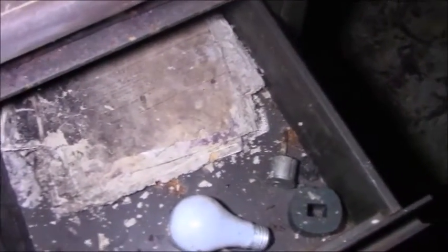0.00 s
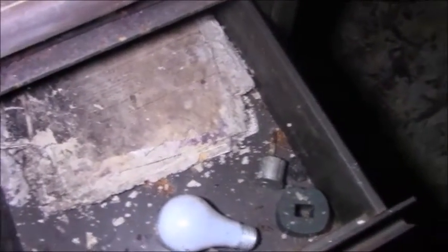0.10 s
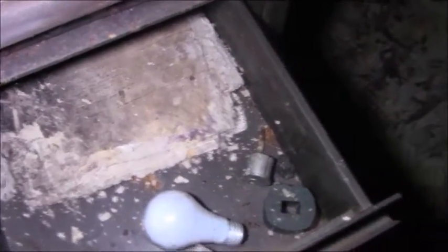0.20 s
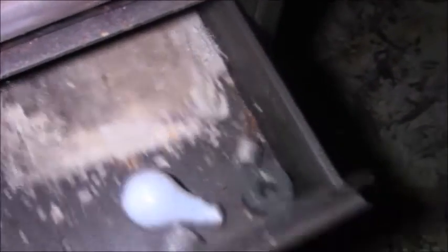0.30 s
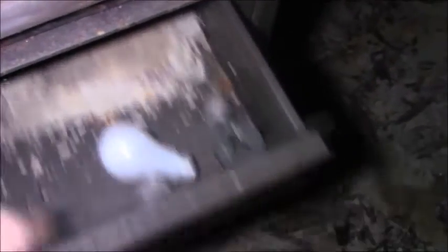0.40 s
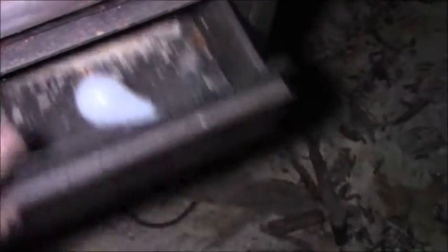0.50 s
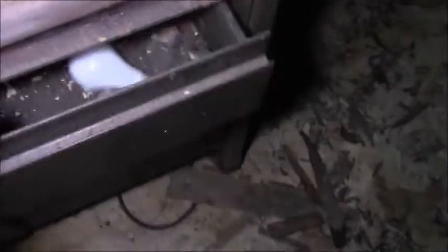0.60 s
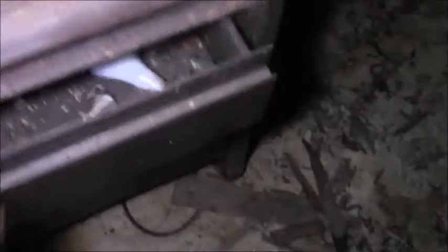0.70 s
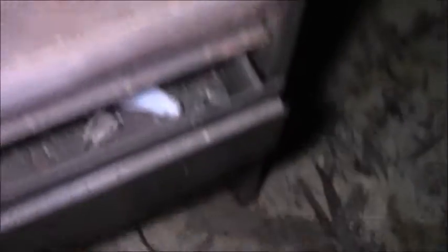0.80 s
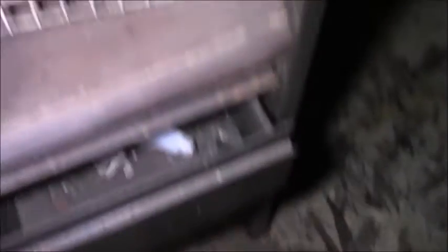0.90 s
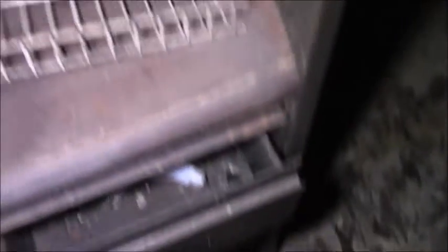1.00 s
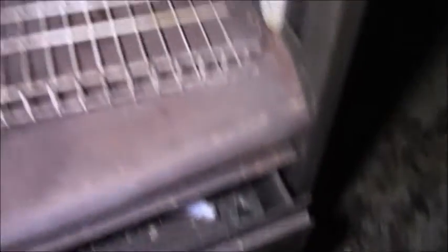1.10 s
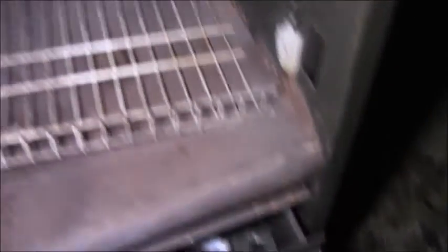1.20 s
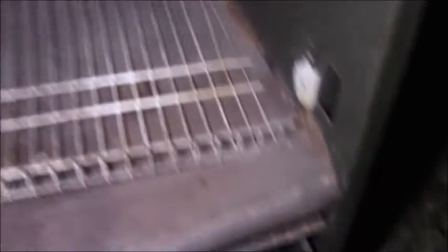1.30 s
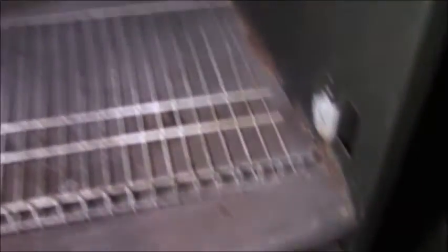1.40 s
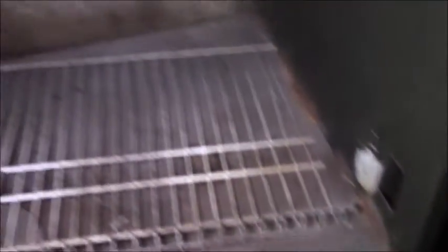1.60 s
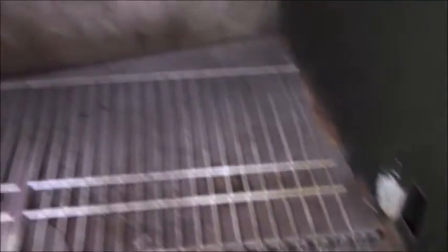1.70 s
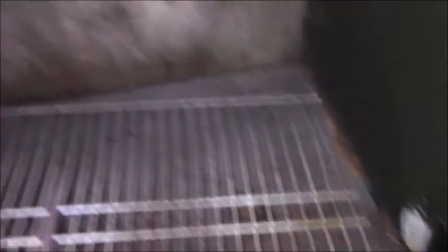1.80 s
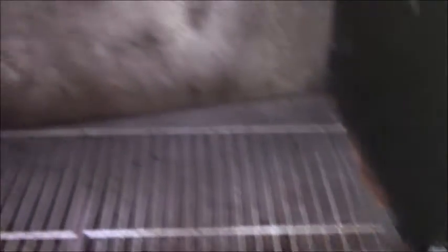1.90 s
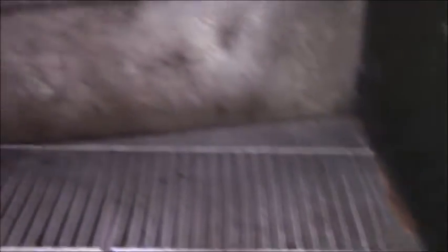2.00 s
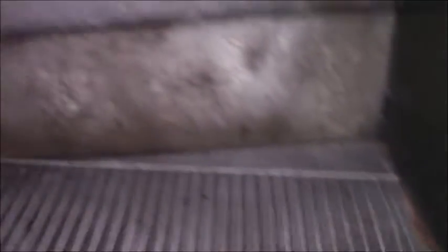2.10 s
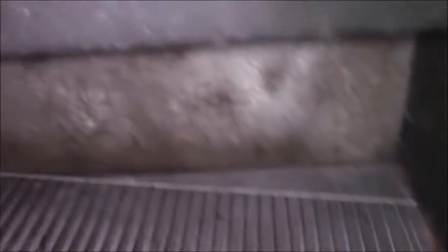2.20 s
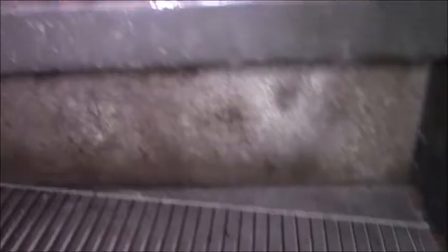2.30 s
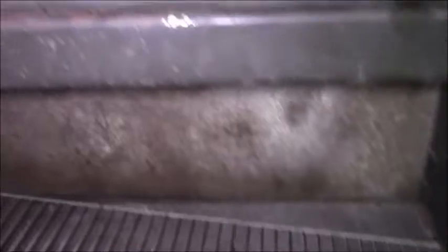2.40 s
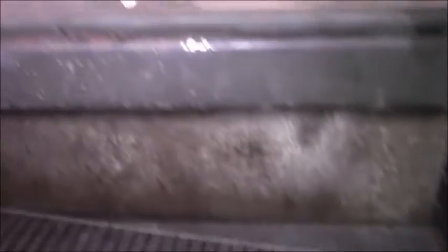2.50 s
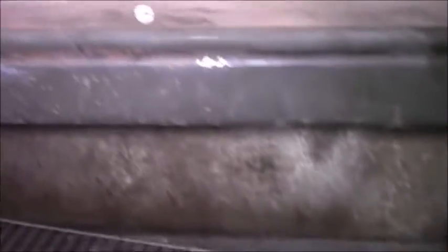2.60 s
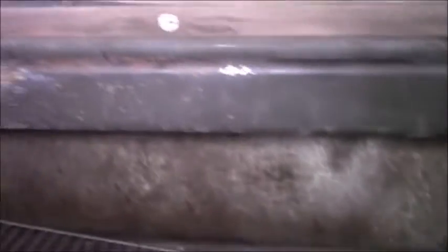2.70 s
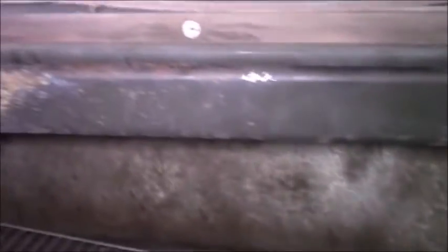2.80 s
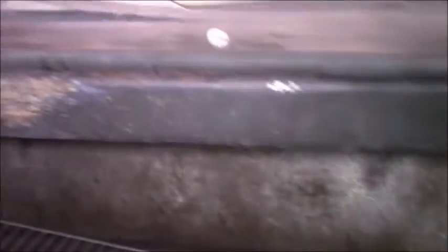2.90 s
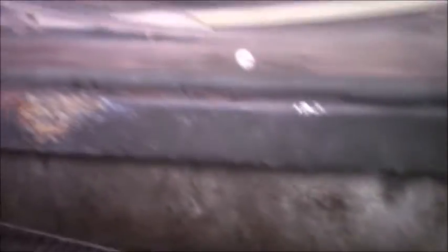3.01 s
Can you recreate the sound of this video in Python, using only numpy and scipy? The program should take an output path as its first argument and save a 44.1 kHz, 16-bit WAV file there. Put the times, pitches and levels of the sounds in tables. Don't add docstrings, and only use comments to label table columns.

```python
import sys
import numpy as np
from scipy import signal
from scipy.fft import rfft, irfft
from scipy.io import wavfile

SR = 44100
rng = np.random.default_rng(int(sys.argv[2]) if len(sys.argv) > 2 else 0)


def gain_from_db(level_db):
    decades = np.asarray(level_db, float) / 20
    return 10 ** decades


def output_pcm(signal):
    pcm = np.clip(np.atleast_2d(signal).T, -1, 1) * 32767
    wavfile.write(sys.argv[1], SR, np.round(pcm).astype(np.int16))


N = 134505


def rms_one(x):
    return x / np.sqrt(np.mean(x ** 2) + 1e-20)


def at_hz(points, hz):
    table_hz, values = np.transpose(points)
    return np.interp(np.log(hz), np.log(table_hz), values)


def through(x, response):
    return signal.fftconvolve(x, response)[:N]


def modes(table, size=SR):
    t = np.arange(size) / SR
    return sum(gain_from_db(db - 60 * t / t60) * np.sin(2 * np.pi * hz * t) for hz, db, t60 in table)


def wobble(per_s):
    return np.interp(np.arange(N) * per_s / SR, np.arange(999), rng.standard_normal(999))


def linger(power, t60):
    keep = gain_from_db(-120 / (t60 * SR))
    return signal.lfilter([1 - keep], [1, -keep], power + 1e-18)


# (frequency [Hz], level [dB])
AIR = [(24, -36.5), (40, -22.5), (107, -9.5), (824, -10), (1030, -12), (7730, -25.5), (14300, -42)]


def room_air():
    hz = np.fft.rfftfreq(N, 1 / SR) + 1
    air = irfft(rfft(rng.standard_normal((2, N))) * gain_from_db(at_hz(AIR, hz)), N)
    mid_side_db = np.array([[-57.5], [-70.5]])
    return air / np.std(air[0]) * gain_from_db(mid_side_db)


# (frequency [Hz], level [dB])
WHINE = [(7504, -76), (15003, -76)]


def whine():
    t = np.arange(N) / SR
    return sum(gain_from_db(db + 2) * np.sin(2 * np.pi * hz * t) for hz, db in WHINE)


def squeak():
    t = np.arange(N) / SR
    middle_s, length_s, hz = 1.875, 0.017, 4250
    return gain_from_db(-62) * np.exp(-((t - middle_s) / length_s) ** 2) * np.sin(2 * np.pi * hz * t)


# (time [s],
# level [dB], pitch [Hz])
FLAKES = [(0.846, -29, 7800), (.879, -46, 12000), (.9945, -27, 7400), (1.025, -43, 9100),
          (1.045, -50, 10000), (1.088, -46, 11000), (1.1275, -53, 9000), (1.1555, -26, 7000),
          (1.212, -48, 8000), (1.388, -46, 8000), (1.41, -48, 9000), (2.866, -46, 10000),
          (2.782, -42, 11000), (2.838, -38, 6500)]
# (time [s], level [dB], pitch [Hz],
# fade [cycles])
POPS = [(0.03, -27, 485, 26), (0.2123, -18.5, 323, 19), (0.2133, -18, 515, 15), (.284, -17.5, 780, 33),
        (.405, -21, 980, 16), (.46, -18.5, 1320, 33), (.54, -13.5, 300, 11), (.636, -16.5, 211, 12),
        (1.154, -29.5, 1720, 78), (1.2801, -25, 990, 25), (2.1004, -37.5, 1500, 8), (2.0718, -44, 1010, 6),
        (2.147, -24, 1370, 25), (2.164, -14, 308, 18), (2.193, -16.5, 297, 15), (2.408, -18, 436, 19),
        (2.69, -9.5, 1000, 28), (2.689, -16.5, 2330, 16), (2.688, -8, 4200, 14)]


def pops_and_flakes():
    out = np.zeros(N + SR)
    flake_cycles = 16
    for s, db, hz, cycles in [*POPS, *[(*flake, flake_cycles) for flake in FLAKES]]:
        start = int(s * SR)
        out[start:start + SR // 4] += modes([(hz, db, cycles / hz)], size=SR // 4)
    return out[:N]


# (time [s], level [dB], contact pitch [Hz])
TICKS = [
    (1.4525, -17, 5600),
    (1.5278, -24.5, 5300),
    (1.5664, -33, 5400),
    (1.588, -47, 6100),
    (1.6438, -31, 1950),
    (1.719, -44, 2600),
    (1.92, -43, 6100),
    (1.937, -54, 7000),
]
# (frequency [Hz], level [dB], t60 [s])
PIECE = [(9200, -22, 0.03), (9320, -24, 0.03), (9588, -40, 0.5), (15010, -26, .06), (7320, -8.5, 0.004),
         (10400, -26.5, .008), (12800, -21.5, 0.0052)]


def metal_piece():
    out = np.zeros(N + SR)
    contact_cycles = 12.3
    for s, db, contact_hz in TICKS:
        dull_db = 14 * (contact_hz < 4000)
        rings = [(hz, ring_db - dull_db, t60) for hz, ring_db, t60 in PIECE]
        tick = modes([(contact_hz, 0, contact_cycles / contact_hz)] + rings, size=SR // 2)
        start = int(s * SR)
        out[start:start + SR // 2] += gain_from_db(db) * tick
    return out[:N]


# (frequency [Hz], level [dB], t60 [s])
GLASS = [(2230, 9, 0.016), (1980, -14, 0.12), (2141, 2.5, 0.17), (2165, 3, 0.17), (5146, -19, 0.22),
         (3058, -38, 0.8), (5160, -21, 0.22), (3187, -13, 0.11), (3505, -13, 0.058), (4300, -23.5, .07),
         (6600, -18, 0.07), (8445, -17, 0.06), (10770, -26.5, 0.05), (1290, 0.5, 0.021)]
# (time [s], level [dB], contact softness corner [Hz])
CLINKS = [
    (.7087, -12.5, 20000),
    (.915, -42.5, 2200),
]


def bulb_clinks():
    out = np.zeros(N + SR)
    for s, db, soft_hz in CLINKS:
        struck = []
        for hz, mode_db, t60 in GLASS:
            softness_db = 20 * np.log10(1 + (hz / soft_hz) ** 4)
            struck.append((hz, mode_db + db - softness_db, t60))
        start = int(s * SR)
        out[start:start + SR] += modes(struck[::2]) - modes(struck[1::2])
    return out[:N]


# (time [s], level [dB])
ROLL = [
    (.7, -21.5),
    (.8, -25.5),
    (0.949, -39.5),
    (1.02, -32.5),
    (1.121, -36.5),
    (1.251, -44),
    (1.35, -33),
    (1.45, -42),
    (1.621, -51),
]


def bulb_roll():
    s, db = np.transpose(ROLL)
    return gain_from_db(np.interp(np.arange(N) / SR, s, db, -150, -150))


def small_things_in_room(small):
    tail = rng.standard_normal((2, SR)) * gain_from_db(-60 * np.arange(SR) / SR / 0.38)
    tail = tail / np.sqrt(np.sum(tail[0] ** 2))
    mid = small + gain_from_db(-16.5) * through(small, tail[0])
    side = 0.058 * small + gain_from_db(-24.5) * through(small, tail[1])
    return np.array([mid, side])


def grains():
    grains_per_s, spread_db, clump_db, clumps_per_s = 6000, 2.5, 2, 40
    size_db = spread_db * np.minimum(rng.exponential(1, N), 4) + clump_db * wobble(clumps_per_s)
    clicks = gain_from_db(size_db) * rng.choice([-1, 1], N)
    return rms_one(clicks * (rng.random(N) < grains_per_s / SR))


def contact(strokes, knocks):
    t, out = np.arange(N) / SR, np.zeros((3, N))
    for stroke in strokes:
        s, force_db, grit_db, boom_db = np.transpose(stroke)
        force = gain_from_db(np.interp(t, s, force_db, -150, -150))
        grit = force * gain_from_db(np.interp(t, s, grit_db))
        boom = force * gain_from_db(np.interp(t, s, boom_db))
        out += [force, grit, boom]
    for s, force_db, length_s, grit_db, boom_db in knocks:
        rise = np.clip((t - s) / (0.29 * length_s), 0, 1)
        fade = np.exp(-np.maximum(t - s, 0) / length_s)
        out += gain_from_db(force_db + np.array([[0], [grit_db], [boom_db]])) * rise * fade
    return out


# (time [s], force [dB], grit re force [dB], boom re force [dB])
PUSH = [
    (.125, -57, 3.5, -6),
    (.19, -31.5, -16.5, -5),
    (.25, -36.5, -13.5, 13),
    (.275, -32, -7, 6),
    (.29, -28.5, -5, -1),
    (.34, -27.5, -8, 9.5),
    (.385, -25, -6.5, 1),
    (.41, -20.5, -13, 3.5),
    (.455, -22, -15.5, -3),
]
PUSH_2 = [
    (.455, -23.5, -7, -0.5),
    (.5, -20, -8, -4),
    (.525, -19, -7.5, -2),
    (.545, -20, -11.5, 3),
    (.6, -23.5, -11, 1),
    (.635, -28.5, -13, 8),
    (.655, -35.5, -22, 19.5),
    (.68, -39, -18.5, 1),
    (0.699, -23.5, -12.5, 0),
]
# (time [s], force [dB], length [s], grit re force [dB], boom re force [dB])
PUSH_KNOCKS = [(0.009, -41, 0.0089, 1.5, -14), (0.027, -23.5, 0.005, 0, -33),
               (0.189, -28, 0.0038, -2, 12.5), (0.205, -34, 0.01, -37, 4), (0.283, -24.5, 0.0075, -23.5, 7),
               (0.458, -22, 0.0072, -2, -35), (0.68, -56, 0.0076, -16, 21), (.709, -7, 0.0023, -11.5, -13),
               (0.839, -31, 0.019, -6.5, -10), (0.982, -33.5, 0.022, -12.5, -1),
               (1.144, -29, 0.03, -10, -12), (1.162, -38, 0.0063, -6, 7), (1.218, -38, 0.019, -17, -1),
               (1.28, -27, 0.012, -13.5, -22), (1.292, -30.5, 0.021, -16.5, 8.5),
               (1.468, -44.5, 0.032, -9, -15), (1.639, -50.5, 0.0098, -0.5, -4),
               (1.692, -56, 0.0087, -13.5, 1.5)]


def push_contact():
    return contact([PUSH, PUSH_2], PUSH_KNOCKS)


# (time [s], force [dB], grit re force [dB], boom re force [dB])
HAND = [
    (1.8, -87, -2, 2.5),
    (1.87, -68, -17, -5),
    (2.0, -62, 13, 9),
    (2.06, -61, -4, 2),
    (2.8, -62.5, 0, -3),
    (2.95, -50, 0.5, 4),
    (3.05, -51, -3, 2),
]
# (time [s], force [dB], grit re force [dB], boom re force [dB])
PULL_1 = [
    (2.2, -51.5, -37, 25),
    (2.25, -42, -4.5, 10),
    (2.3, -32.5, -9, 5.5),
    (2.33, -23, -5, 3),
    (2.365, -19.5, -6, -3),
    (2.41, -18.5, -8.5, -3.5),
    (2.45, -22, -12.5, 1),
    (2.51, -32, -18, 13.5),
    (2.56, -36, -9, 5),
]
PULL_2 = [
    (2.549, -36.5, -14, 6.5),
    (2.585, -22.5, -12, -0.5),
    (2.605, -18, -18, -8),
    (2.63, -19.5, -8.5, 1),
    (2.66, -18, -8.5, -6),
    (2.7, -21, -13, -4),
    (2.73, -26.5, -19, -1),
    (2.79, -34, -20, 7.5),
    (2.859, -48, -17, 13.5),
]
# (time [s], force [dB], length [s], grit re force [dB], boom re force [dB])
PULL_KNOCKS = [(2.071, -42, 0.0048, 3.5, -12), (2.1, -45.5, 0.0092, 9.5, -23),
               (2.137, -27.5, 0.0085, -10, -9), (2.145, -21.5, 0.015, -18, -17),
               (2.163, -36, 0.02, -2, 17.5), (2.687, -11, 0.0097, -12, -33),
               (2.914, -44, 0.006, -1.5, 17.5), (2.968, -48, 0.0045, -7, 17)]


def pull_contact():
    return contact([HAND, PULL_1, PULL_2], PULL_KNOCKS)


BAND_EDGES = 50 * 2 ** np.arange(0, 8.5, 1 / 3)
# (frequency [Hz], t60 [s])
SHEET_T60 = [(100, .2), (1000, 0.1), (14000, 0.014)]
ROOM_T60 = [(100, 1), (1500, 0.52), (14000, 0.068)]
# (frequency [Hz], side level [dB])
WIDTH = [(60, -25), (180, -52), (350, -30.5), (1650, -21), (7000, -9.5), (15000, -23)]


def sheet_and_room(drives, colours):
    out, white = np.zeros((2, N)), rng.standard_normal((2, 2, N))
    direct_db, room_db, side_room_db = -0.5, -5.5, -6
    patch_db, patches_per_s = 2, 25
    for k, (low, high) in enumerate(zip(BAND_EDGES, BAND_EDGES[1:])):
        hz = np.sqrt(low * high)
        x = sum(drive * gain_from_db(at_hz(colour, hz)) for drive, colour in zip(drives, colours))
        x = x * gain_from_db(patch_db * wobble(patches_per_s))
        sheet = linger(x ** 2, at_hz(SHEET_T60, hz))
        room = linger(x ** 2, at_hz(ROOM_T60, hz))
        mid_noise, side_noise = white[k % 2]
        mid = gain_from_db(direct_db) * x + mid_noise * np.sqrt(sheet + gain_from_db(2 * room_db) * room)
        side = side_noise * np.sqrt(sheet + gain_from_db(2 * side_room_db) * room) * gain_from_db(at_hz(WIDTH, hz))
        band = signal.butter(2, [low, high], "band", fs=SR, output="sos")
        out += signal.sosfilt(band, [mid, side])
    return out


# (frequency [Hz], level [dB per Hz])
SHEET = [(60, -38), (90, -24), (250, -1), (700, -2.5), (1800, -8.5), (3500, -23), (6000, -55)]
# (frequency [Hz], level [dB per Hz])
PUSH_GRIT = [(1500, 5.5), (2500, 5.5), (4000, -5), (5500, -3), (7500, -4), (10000, -7), (12000, -10),
             (16000, -16)]
PULL_GRIT = [(1500, -10), (2500, 0.5), (3800, -4.5), (5200, 0.5), (8000, -7), (11000, -8.5), (13500, -17.5),
             (16000, -15)]


def scrape(push, pull, roll):
    debris = np.minimum(roll, gain_from_db(-35.5)) * gain_from_db(-26 + 5.2 * wobble(70))
    sheet_db, grit_db = 10.5, 4
    sheet_drive = gain_from_db(sheet_db) * grains() * (push[0] + pull[0])
    push_drive = gain_from_db(grit_db) * grains() * (push[1] + debris)
    pull_drive = gain_from_db(grit_db) * grains() * pull[1]
    return sheet_and_room([sheet_drive, push_drive, pull_drive], [SHEET, PUSH_GRIT, PULL_GRIT])


# (frequency [Hz], level [dB], t60 [s])
PUSH_RUNNER = [(1320, -8, 0.045), (1720, -9, 0.04), (5300, -15, 0.019), (6440, -6, 0.014), (7500, -5, .015),
               (10950, -12, 0.014)]
PULL_RUNNER = [(843, -11.5, .03), (1517, -8, 0.043), (1723, -6.5, 0.051), (3980, -5.5, 0.027),
               (5020, -2.5, 0.016), (13800, -13, .01)]


def runners(push_grit, pull_grit):
    out = np.zeros(N)
    for grit, runner in [(push_grit, PUSH_RUNNER), (pull_grit, PULL_RUNNER)]:
        scale = gain_from_db(-7) / np.sqrt(np.sum(modes(runner, size=SR // 8) ** 2))
        for mode in runner:
            drive = grains() * grit * gain_from_db(4 * wobble(14))
            out += scale * through(drive, modes([mode], size=SR // 8))
    return out


# (frequency [Hz], level [dB])
PUSH_PANEL = [(90, -11.5), (120, -17), (146, -17), (195, 0), (218, 2), (242, 1.5), (270, 2.5), (308, 3),
              (337, 0.5), (387, -7.5), (431, -6.5), (477, -7), (525, -1)]
PULL_PANEL = [(88, -9.5), (121, -12), (167, -37), (200, -18), (262, 3.5), (303, 5.5), (360, 2), (419, 2),
              (446, -11), (548, -1), (640, -9), (690, -3.5)]


def panels(push_boom, pull_boom):
    out = np.zeros((2, N))
    side_db = -44
    for force, panel, boom_db in [(push_boom, PUSH_PANEL, -6.5), (pull_boom, PULL_PANEL, -2.5)]:
        ring = modes([(hz, db, 0.33 * 200 / hz) for hz, db in panel])
        ring = ring / np.sqrt(np.sum(ring ** 2))
        for channel, db in enumerate([boom_db, boom_db + side_db]):
            out[channel] += gain_from_db(db) * through(rng.standard_normal(N) * force, ring)
    return out


def drawers():
    push, pull, roll = push_contact(), pull_contact(), bulb_roll()
    out = scrape(push, pull, roll)
    out[0] += runners(push[1], pull[1])
    return out + panels(push[2] + roll, pull[2])


def scene():
    mid, side = room_air() + small_things_in_room(metal_piece() + bulb_clinks()) + drawers()
    mid = mid + whine() + squeak() + pops_and_flakes()
    return np.array([mid + side, mid - side])


def top_cut(x):
    return signal.sosfilt(signal.butter(12, 16650, fs=SR, output="sos"), x)


def record(dry):
    bass_cut = signal.butter(3, 104, "high", fs=SR, output="sos")
    treble_cut = signal.cheby2(10, 22.0, 16100, fs=SR, output="sos")
    cut = signal.sosfilt(treble_cut, signal.sosfilt(bass_cut, dry))
    mix = 1.294 * np.tanh(cut / 1.103)
    return top_cut(mix)


dry = scene()
out = record(dry)
output_pcm(out)
```